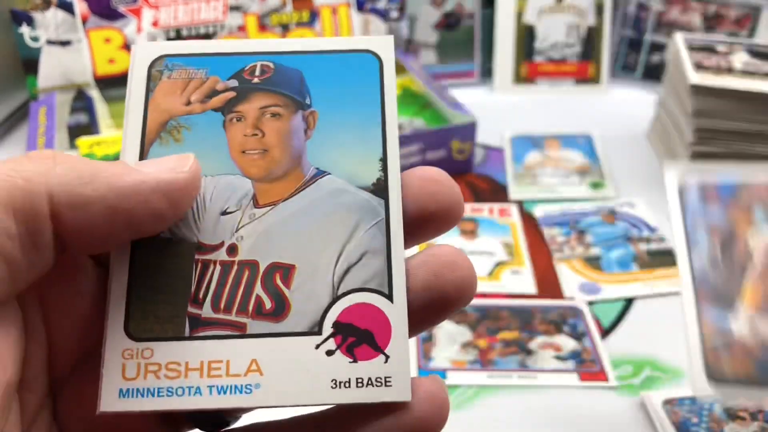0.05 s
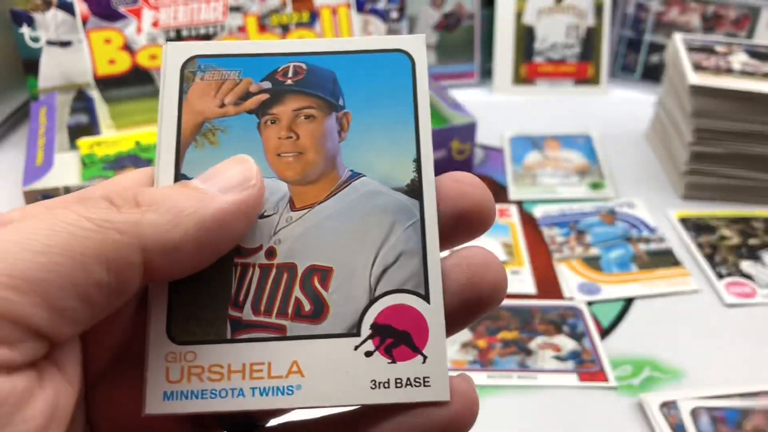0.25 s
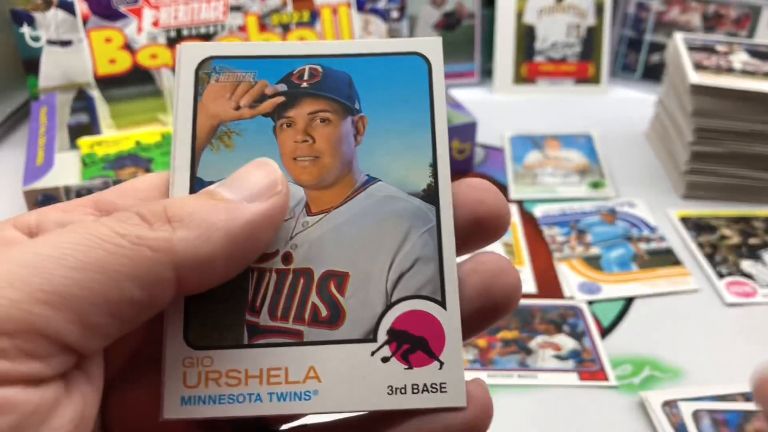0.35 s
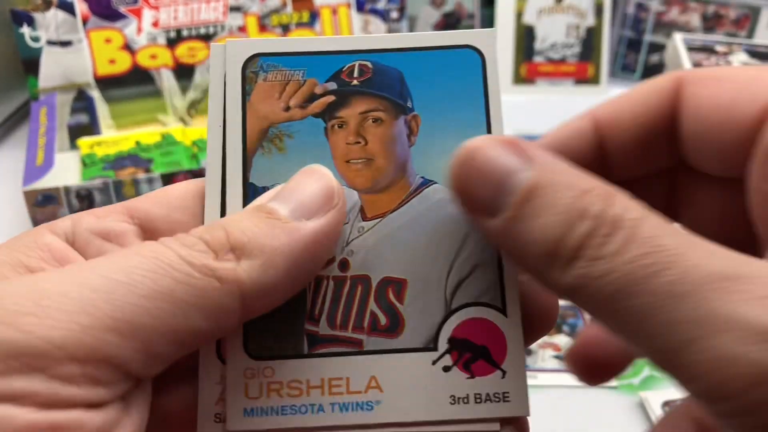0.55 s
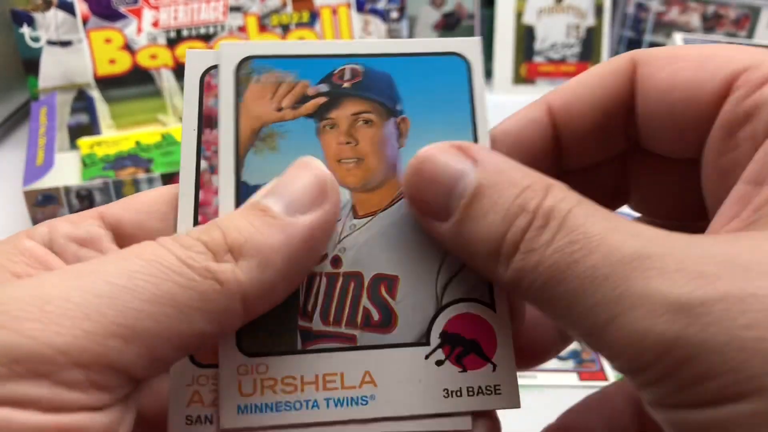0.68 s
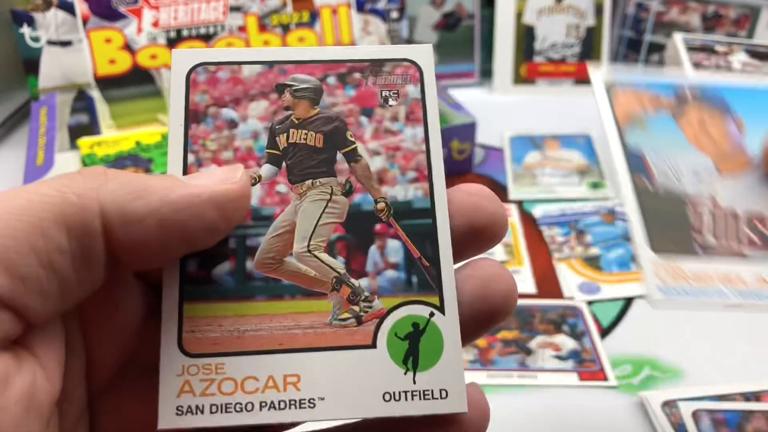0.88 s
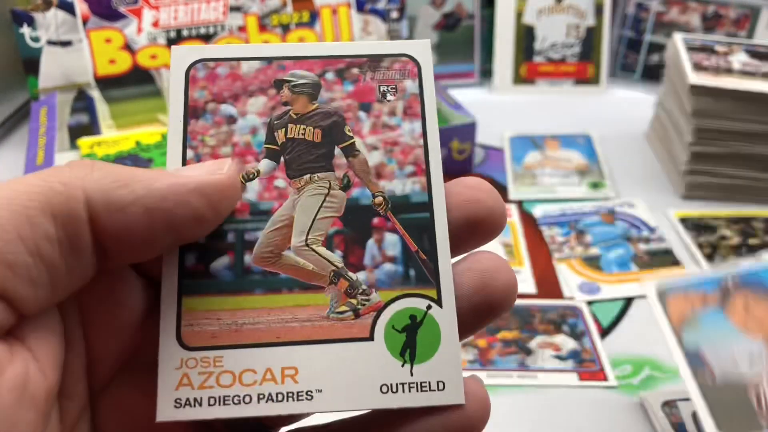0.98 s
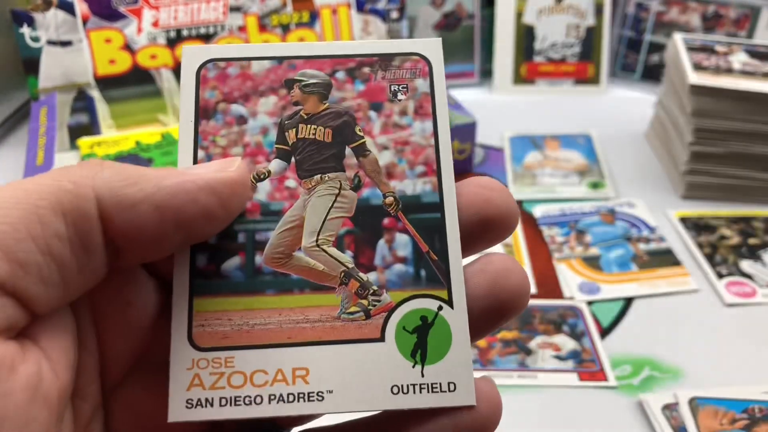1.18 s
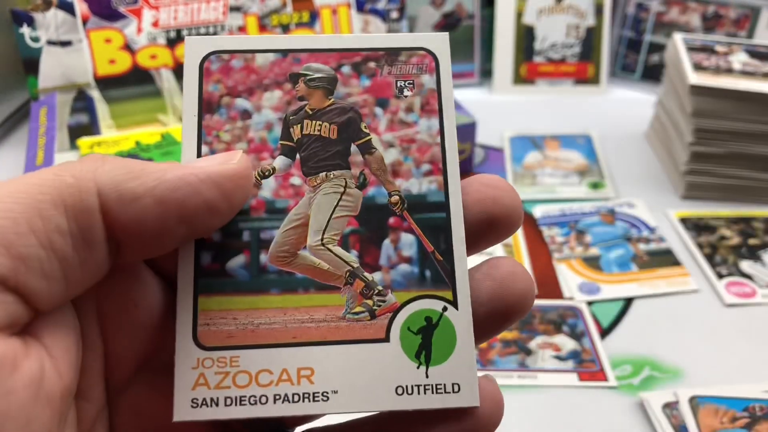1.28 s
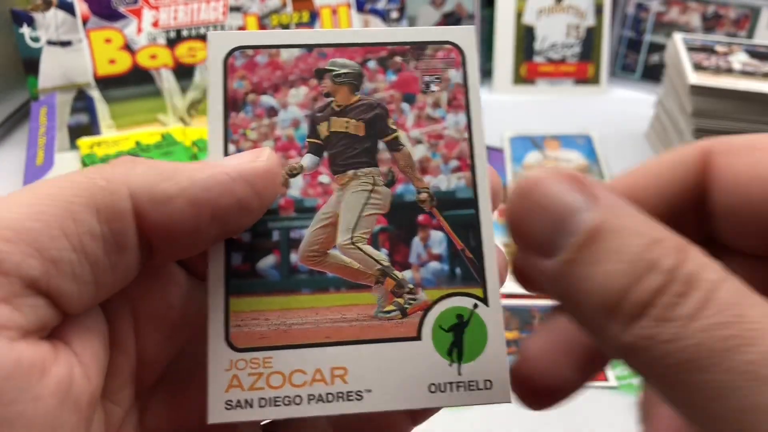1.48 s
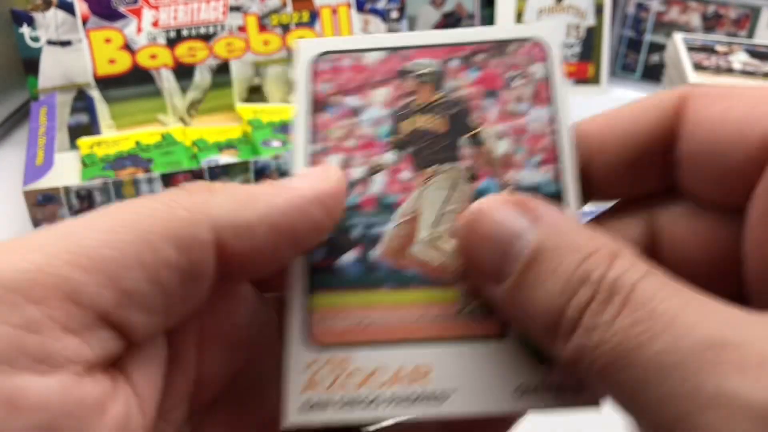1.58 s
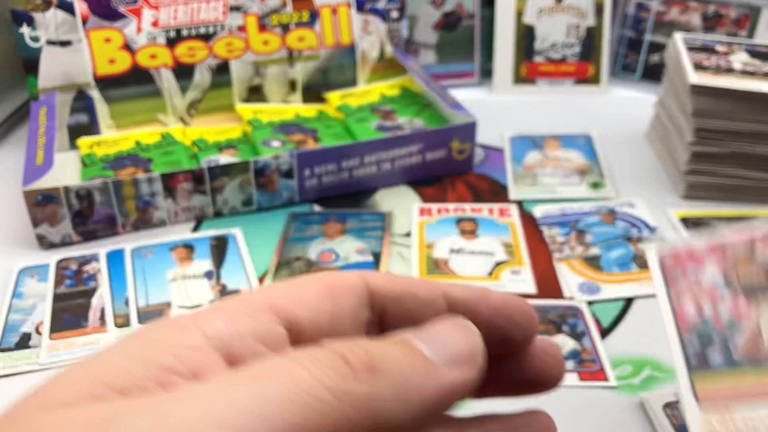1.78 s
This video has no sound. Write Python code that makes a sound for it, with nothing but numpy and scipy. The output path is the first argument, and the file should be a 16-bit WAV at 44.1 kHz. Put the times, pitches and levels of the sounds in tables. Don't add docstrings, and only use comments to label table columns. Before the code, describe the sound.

Glossy cards are dealt one by one, hissing, clicking and lightly tapping in a quiet room.

```python
import sys
import numpy as np
from scipy import signal
from scipy.fft import rfft, irfft, next_fast_len
from scipy.io import wavfile
from scipy.ndimage import uniform_filter1d, minimum_filter1d

SR = 44100
rng = np.random.default_rng(int(sys.argv[2]) if len(sys.argv) > 2 else 0)


def wav_record(signal):
    frames = np.transpose(np.atleast_2d(signal))
    bounded = np.clip(frames, -1, 1)
    quanta = np.round(bounded * 32767).astype(np.int16)
    wavfile.write(sys.argv[1], SR, quanta)


def undo_db(level):
    steps = np.asarray(level, float) / 20
    return 10 ** steps


N = 81585


def unit(x):
    return x / np.sqrt(np.mean(x ** 2) + 1e-20)


def along(points, hz):
    point_hz, db = np.transpose(points)
    return undo_db(np.interp(np.log(hz + 1), np.log(point_hz + 1), db, left=-120))


def filtered(x, response):
    size = next_fast_len(len(x) + 8192)
    hz = np.fft.rfftfreq(size, 1 / SR)
    return irfft(rfft(x, size) * response(hz), size)[:len(x)]


def peak(f, hz, width_hz):
    return 1j * f * width_hz / (hz * hz - f * f + 1j * f * width_hz)


def resonant_noise(length, hz, width_hz):
    return unit(filtered(rng.standard_normal(length), lambda f: peak(f, hz, width_hz) ** 2))


def patchy(x, depth_db):
    z = signal.stft(x, nperseg=256)[2]
    field = uniform_filter1d(rng.standard_normal(z.shape), size=4, axis=0)
    field = uniform_filter1d(field, size=15, axis=1)
    return unit(signal.istft(z * undo_db(depth_db * unit(field)), nperseg=256)[1][:N])


# (frequency [Hz], level [dB per Hz])
ROOM = [(18, -73), (30, -10), (134, -6.5), (286, -15), (698, -20.5), (755, -27), (955, -21), (1090, -27),
        (15800, -41.5)]
# (frequency [Hz], width [Hz], level [dB])
HUM = [(119.9, 8.7, -65.5), (697.4, 25, -81.5)]


def room():
    air = patchy(filtered(rng.standard_normal(N), lambda f: along(ROOM, f)), depth_db=0.04)
    hum = sum(undo_db(db) * resonant_noise(N, hz, width_hz) for hz, width_hz, db in HUM)
    return undo_db(-65.5) * air + hum


def echo(x):
    t = np.arange(SR // 5) / SR
    t60_s, level_db = 0.15, -21.5
    tail = rng.standard_normal(len(t)) * undo_db(-60 * t / t60_s)
    return undo_db(level_db) * signal.fftconvolve(x, tail / np.linalg.norm(tail))[:N]


# (time [s], length [s], pitch [Hz], level [dB], sharpness [Q])
DRAGS = [(0.0095, .09, 688, -73.5, 7.3), (.895, .06, 690, -68.5, 7), (1.6, 0.26, 1260, -74, 7),
         (1.8, .05, 720, -71.5, 7), (.21, .035, 3100, -56, 5), (.237, .027, 3190, -51, 8),
         (1.13, 0.025, 3120, -54.5, 6), (1.107, .016, 3300, -59, 11), (1.612, 0.044, 4200, -68, 7.5),
         (1.6, 0.064, 7100, -68, 5.8), (.225, .035, 5000, -61.5, 7), (.712, .05, 3900, -52, 3),
         (.775, .045, 3500, -51, 5), (.11, .058, 3100, -66, 6.3), (.755, 0.095, 1490, -61, 2.1),
         (.72, 0.052, 2260, -60, 6.4), (.775, .05, 4940, -51.5, 3), (.79, 0.044, 8000, -55, 6),
         (.652, 0.024, 3500, -57, 8.1), (.615, 0.029, 3370, -59, 6.7), (1.533, .012, 2700, -58, 2.2),
         (1.54, 0.023, 6800, -63, 5.5), (1.673, 0.021, 3950, -57, 3.6), (1.68, 0.029, 8550, -61.5, 4.5),
         (1.163, 0.037, 3390, -67, 10), (.215, 0.038, 1310, -60, 4), (.285, 0.031, 1500, -65, 2),
         (.3, 0.029, 187, -57.5, 3), (.09, .04, 5200, -69, 6), (1.312, .02, 3220, -73.5, 6)]


def drags():
    t, out = np.arange(N) / SR, np.zeros(N)
    for start, length, hz, db, q in DRAGS:
        swell = np.sin(np.pi * np.clip((t - start) / length, 0, 1)) ** 0.5
        out += undo_db(db) * np.abs(swell) * resonant_noise(N, hz, hz / q)
    return out


# (time [s], peak level [dB], centre [Hz], t60 [s])
RATTLES = [(.223, -48, 700, 0.067), (.27, -32, 5400, 0.019), (.2716, -26, 5000, 0.012),
           (0.2758, -33, 4170, 0.015), (0.2766, -29, 1550, 0.01), (0.28, -29, 5700, 0.01),
           (.302, -44, 4900, 0.016), (0.813, -48.5, 890, 0.048), (0.85, -42, 5000, 0.0081),
           (.905, -61.5, 804, 0.21), (1.0815, -43.5, 2270, 0.05), (1.1005, -41.5, 7120, 0.017),
           (1.121, -47, 674, 0.041), (1.1549, -39, 6000, 0.027), (1.164, -43, 7560, 0.011),
           (1.5857, -37, 1920, 0.009), (1.586, -39, 6400, 0.014), (1.687, -47, 3570, 0.011),
           (.612, -57.5, 806, 0.062)]
# (time [s], peak level [dB], centre [Hz], t60 [s])
RINGS = [(1.1545, -31.5, 3340, 0.038), (1.155, -33.5, 4300, 0.023), (1.155, -35.5, 7200, 0.019),
         (1.158, -45.5, 9200, .04), (1.155, -39, 11600, 0.013), (1.155, -38, 1150, .03),
         (.002, -52, 3100, .07), (.042, -58, 1000, .02), (.481, -50, 7000, .03), (1.165, -44, 4400, .012),
         (1.08, -39, 2450, 0.023), (1.0805, -38, 1116, 0.029), (1.083, -47, 4700, 0.013),
         (1.1, -43, 3100, 0.016), (1.0995, -42, 5400, 0.013), (.2705, -38, 1083, 0.031),
         (.836, -48, 1000, .03), (.838, -46, 600, .05), (.279, -38, 9000, .012), (.834, -46, 1670, 0.028),
         (.835, -39.5, 4940, 0.016)]


def rattles(rows, q):
    out, t = np.zeros(N + SR), np.arange(SR // 5) / SR
    rise = 1 - np.exp(-t / 0.00057)
    for start, db, hz, t60 in rows:
        noise = resonant_noise(len(t), hz, hz / q)
        out[round(start * SR):][:len(t)] += undo_db(db - 1.5 - 60 * t / t60) * rise * noise
    return out[:N]


# (time [s], peak level [dB], first pitch [Hz], last pitch [Hz], t60 [s])
PUFFS = [(0.187, -41.5, 400, 131, 0.11), (.277, -36, 1112, 534, 0.062), (0.278, -44, 292, 93, 0.13),
         (.362, -45, 280, 186, 0.049), (0.426, -56.5, 243, 145, 0.12), (.482, -53, 298, 165, 0.093),
         (0.531, -49, 297, 161, 0.094), (.838, -46, 376, 68.3, 0.095), (1.073, -43, 419, 206, 0.1),
         (1.0995, -43, 760, 570, 0.05), (1.157, -36, 560, 385, 0.08), (1.169, -48, 240, 94.6, 0.13),
         (1.536, -57, 365, 235, .06), (1.5852, -43.5, 500, 70, 0.13), (.815, -48.5, 249, 190, 0.06)]


def puffs():
    out, t = np.zeros(N + SR), np.arange(SR // 5) / SR
    roughness, fall_s, rise_s = 0.2, 0.00573, 0.0015
    for start, db, first_hz, last_hz, t60 in PUFFS:
        pitch_wander, level_wander = (unit(uniform_filter1d(v, size=90))
                                      for v in rng.standard_normal((2, len(t))))
        pitch = last_hz + (first_hz - last_hz) * np.exp(-t / fall_s)
        pitch = pitch * (1 + 0.52 * roughness * pitch_wander)
        level = undo_db(db - 60 * t / t60) * (1 - np.exp(-t / rise_s)) * (1 + roughness * level_wander)
        out[round(start * SR):][:len(t)] += level * np.sin(2 * np.pi * np.cumsum(pitch) / SR)
    return out[:N]


# (time [s], peak level [dB], low ring [Hz], high ring [Hz], t60 [s])
SNAPS = [(0.0515, -55, 2400, 8640, 0.0069), (0.184, -35, 1400, 5620, 0.0072),
         (0.1883, -36, 3330, 5270, 0.003), (0.2751, -10, 5700, 5000, 0.0032),
         (0.2752, -17, 9820, 12500, 0.0027), (0.3612, -39.5, 4250, 6400, 0.0033),
         (0.6907, -46, 1020, 2000, 0.01), (0.836, -35.5, 1200, 3730, 0.0054),
         (1.0703, -42, 1130, 2320, 0.011), (1.0804, -32, 1500, 3500, 0.005),
         (1.0803, -33, 3400, 2450, 0.006), (1.0995, -26.5, 7200, 10460, 0.002),
         (1.156, -29.5, 3450, 4740, 0.0054), (1.584, -20, 2300, 6800, 0.0019),
         (1.1557, -34, 7470, 11700, .004), (1.699, -32, 2070, 3700, 0.004),
         (1.5345, -49, 2300, 7040, 0.0061), (0.221, -45, 8500, 13000, 0.0066),
         (0.0417, -57, 2040, 4100, 0.0069)]


def snaps():
    out, t = np.zeros(N + SR), np.arange(SR // 10) / SR
    high_ring_db, click_db, shiver_db = -3.5, -1.5, -6
    rise = 1 - np.exp(-t / 0.0002)
    for start, db, low_hz, high_hz, t60 in SNAPS:
        click_noise, shiver_noise = rng.standard_normal((2, len(t)))
        tones = np.sin(2 * np.pi * low_hz * t) + undo_db(high_ring_db) * np.sin(2 * np.pi * high_hz * t)
        ring = tones * undo_db(-60 * t / t60) * rise
        click = np.diff(click_noise * undo_db(-60 * t / 0.0018), prepend=0)
        click = click * min(high_hz / 8000, 1) ** 2
        shiver = filtered(shiver_noise, lambda f: peak(f, low_hz, low_hz) - peak(f, high_hz, high_hz))
        shiver = shiver * undo_db(-60 * t / (t60 * 1.64))
        snap = 1.165 * ring + undo_db(click_db) * 0.37 * click + undo_db(shiver_db) * shiver
        out[round(start * SR):][:len(t)] += undo_db(db) * snap
    return out[:N]


def friction():
    caught = rng.random(N) < 2200 / SR
    catches = caught * rng.standard_normal(N) * undo_db(-4 * rng.exponential(size=N))
    return rng.standard_normal(N) + undo_db(-16) * unit(catches)


def bridged(power):
    return minimum_filter1d(-minimum_filter1d(-power, size=261), size=261)


# (time [s], length [s], first level [dB], last level [dB], brightness [dB])
HAND = [(.3615, 0.011, -46.5, -58.5, -5.5), (.405, 0.0047, -64, -59, -12), (.411, 0.0095, -50, -64, -7.5),
        (.4225, 0.014, -49, -60.5, -4.5), (.48, 0.014, -50.5, -57.5, -2.5), (.52, 0.0052, -62, -61, -7),
        (.527, 0.016, -47.5, -62, -1.5), (.543, 0.047, -58, -58.5, -7.5), (.596, .056, -55, -61, 4),
        (.652, 0.07, -58, -58, 6), (.706, 0.1293, -46.5, -46.5, 5), (.836, 0.044, -51, -58, -2.5),
        (.885, 0.053, -65.5, -62, 5), (1.568, 0.0096, -67.5, -65, 0), (1.762, 0.03, -73, -70, 13),
        (1.785, 0.045, -69, -76, 13)]
# (time [s], length [s], first level [dB], last level [dB], brightness [dB])
PILE = [(0, 0.042, -54.5, -83, -6.5), (.045, 0.046, -69, -75.5, -2.5), (.088, 0.077, -68, -63.5, -4),
        (.184, 0.03, -49, -53.5, -2.5), (.21, 0.076, -48.5, -46, -4.5), (.284, 0.029, -56.5, -56.5, -1),
        (.316, 0.024, -70, -61.5, -12), (1.069, 0.03, -59, -56, -5.5), (1.1, 0.056, -57, -53, -1),
        (1.152, 0.026, -45.5, -61, -6), (1.176, 0.069, -64.5, -78, -6), (1.31, .03, -73, -80, -16),
        (1.533, 0.033, -56, -58, -0.5), (1.588, 0.078, -63.5, -60.5, 1.5), (1.66, 0.05, -58, -53.5, -1)]
# (frequency [Hz], width [Hz], level [dB])
CARD = [(3304, 590, 0.5), (4100, 1460, 0.5), (5010, 2100, -3.5), (8000, 950, -12)]
# (frequency [Hz], level [dB])
HISS = [(1500, -11), (3000, -0.5), (6000, 0.5), (10000, -1), (15500, -3.5)]
# (frequency [Hz], level [dB])
SHEET = [(250, -12), (650, -3), (1300, -6.5), (2500, -13.5)]


def hollow(f):
    modes = sum((-1) ** k * undo_db(db) * peak(f, hz, width_hz) for k, (hz, width_hz, db) in enumerate(CARD))
    return modes * peak(f, 3370, 7300)


def slides(rows, sheet_db):
    t = np.arange(N) / SR
    force, shine = np.zeros(N), np.zeros(N)
    grip_s, grip_share, let_go_s = 0.00058, 0.089, 0.0041
    for start, length, first_db, last_db, bright_db in rows:
        grip = np.clip((t - start) / (grip_s + grip_share * length), 0, 1)
        let_go = np.exp(-np.clip(t - start - length - grip_s, 0, 1) / let_go_s)
        level = undo_db(np.interp(t, [start, start + length], [first_db, last_db]))
        power = (grip * let_go * level) ** 2
        force = np.maximum(force, power)
        shine = np.maximum(shine, power * undo_db(2 * bright_db))
    force, shine = bridged(force), bridged(shine)
    body = patchy(filtered(friction(), hollow), depth_db=1.5)
    hiss = patchy(filtered(friction(), lambda f: along(HISS, f)), depth_db=2.5)
    sheet = patchy(filtered(friction(), lambda f: along(SHEET, f) * (f < SHEET[-1][0])), depth_db=3)
    return np.sqrt(force) * (0.55 * body + undo_db(sheet_db) * sheet) + undo_db(-2.5) * np.sqrt(shine) * hiss


def scene():
    cards = drags() + rattles(RATTLES, q=0.79) + rattles(RINGS, q=4.9) + puffs() + snaps()
    cards = cards + slides(HAND, sheet_db=-15.5) + slides(PILE, sheet_db=-8)
    return np.tile(cards + echo(cards) + room(), (2, 1))


def top_cut(x):
    return signal.sosfilt(signal.butter(12, 17160, fs=SR, output="sos"), x)


def record(dry):
    low_cut_hz, top_hz, click_top_hz, click_jump_db = 36, 15800, 16900, 11
    mono = dry[0]
    low = filtered(mono, lambda f: (f < top_hz) * f ** 4 / (f ** 4 + low_cut_hz ** 4))
    top = filtered(mono, lambda f: (f >= top_hz) * (f < click_top_hz))
    fast, slow = (np.abs(uniform_filter1d(mono ** 2, size=k)) for k in (128, 4096))
    sharp = 1.0 * (fast > slow * undo_db(click_jump_db) ** 2)
    mix = low + top * uniform_filter1d(sharp, size=128)
    return top_cut(np.array([mix, mix]))


dry = scene()
out = record(dry)
wav_record(out)
```